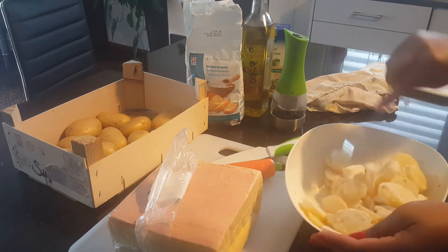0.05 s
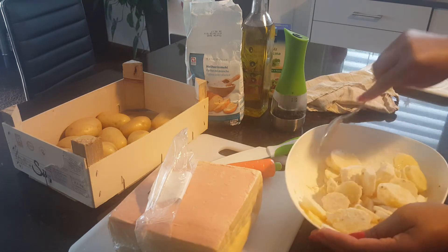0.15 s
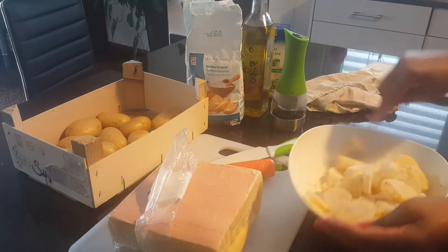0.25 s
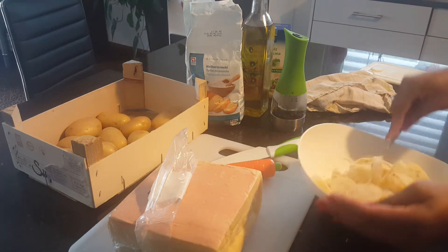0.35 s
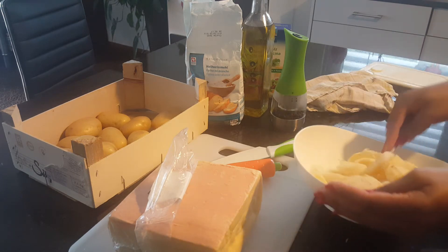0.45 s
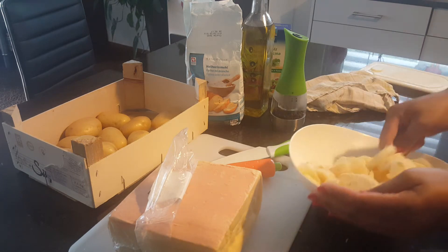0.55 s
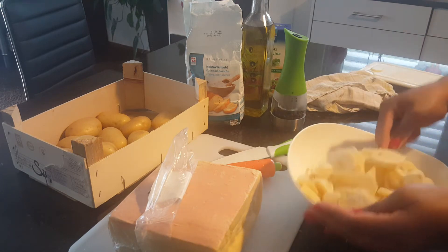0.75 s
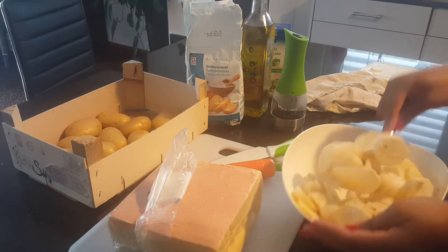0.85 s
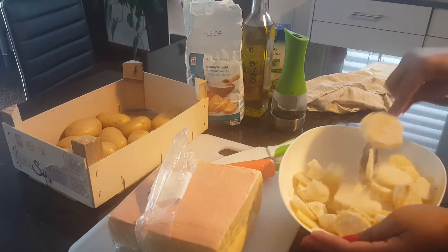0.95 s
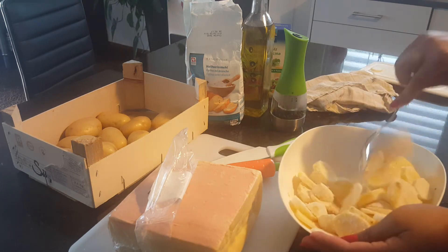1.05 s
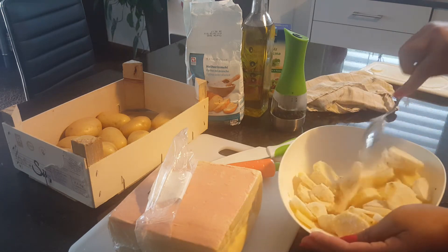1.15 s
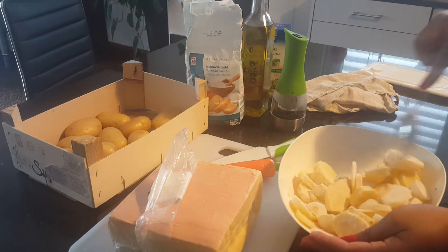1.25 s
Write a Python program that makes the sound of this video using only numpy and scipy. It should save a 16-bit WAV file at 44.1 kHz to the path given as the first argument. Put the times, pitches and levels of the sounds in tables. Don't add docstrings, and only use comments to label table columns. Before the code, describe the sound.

A metal spoon turns raw potato slices in a bowl, heard close by a phone microphone. A soft wet slide fades before a hard, bright, quickly damped knock at 0.23 s. A light tick follows at 0.29, then scrapes with small clicks near 0.35 and, fainter, 0.6. Sliding ebbs until a soft, dull landing at 1.0 s and a faint trailing rustle. Low appliance hum and short kitchen echoes surround it.

```python
import sys
import numpy as np
from scipy import signal
from scipy.fft import rfft, irfft
from scipy.io import wavfile

SR = 44100
rng = np.random.default_rng(int(sys.argv[2]) if len(sys.argv) > 2 else 0)


def bounce(signal):
    frames = np.transpose(np.atleast_2d(signal))
    limited = np.clip(frames, -1, 1)
    pcm = np.round(limited * 32767).astype(np.int16)
    wavfile.write(sys.argv[1], SR, pcm)


def to_linear_factor(level_db):
    exponent = np.asarray(level_db, float) / 20
    return 10 ** exponent


N = 57330


def evened(x):
    return x / np.sqrt(np.mean(x ** 2) + 1e-20)


def read(points, hz):
    f, value = np.transpose(points)
    return np.interp(np.log(hz + 1), np.log(f + 1), value)


def add(mix, s, sound):
    part = mix[round(s * SR):][:len(sound)]
    part += sound[:len(part)]


def coloured(x, spectrum):
    n = x.shape[-1]
    gain = to_linear_factor(read(spectrum, np.fft.rfftfreq(n, 1 / SR)))
    return irfft(rfft(x) * gain, n)


def left_right(a, b, same):
    return np.array([a, same * a + np.sqrt(1 - same ** 2) * b])


# frequency [Hz], level [dB].
HUM_SPECTRUM = [(25, -13.5), (45, -21.5), (130, -6), (400, -11), (1000, -16.5), (3000, -33.5), (6500, -53),
                (15000, -47.5)]
# centre [Hz], width [Hz], level [dB].
DRONES = [(68, 7.7, -75), (99.8, 6.2, -60.5), (132.3, 17, -56), (171, 8.3, -68.5), (277.3, 10, -64),
          (457, 25, -67)]
# frequency [Hz], likeness [-1 to 1].
LIKENESS = [(60, 0.98), (180, 0.92), (550, 0.67), (1650, -0.46), (4970, 0.14), (15000, -0.18)]


def appliance_hum():
    hum_db = -48
    hz = np.fft.rfftfreq(N, 1 / SR)
    a, b = rfft(rng.standard_normal((2, N)))
    noise = left_right(a, b, np.clip(read(LIKENESS, hz), -1, 1))
    out = to_linear_factor(hum_db) * evened(irfft(noise * to_linear_factor(read(HUM_SPECTRUM, hz)), N))
    for centre_hz, width_hz, db in DRONES:
        peak = 1 / (1 + ((hz - centre_hz) / width_hz * 2) ** 2)
        out = out + to_linear_factor(db) * evened(irfft(noise * peak, N))
    return out


# delay [s], left level [dB], right level [dB].
ECHOES = [(.0007, -20.5, -15), (.0019, -10.5, -39), (.0028, -49, -38), (.0072, -10.5, -10.5),
          (.0112, -24, -30), (.016, -24.5, -21.5), (.0225, -21, -24), (.029, -15, -21)]
# frequency [Hz], time to fall 60 dB [s].
TAIL_T60 = [(250, 0.48), (700, 0.63), (1800, 0.48), (4500, 0.8), (12000, 0.3)]


def early_echoes():
    dull_hz = 2310
    echoes = np.zeros((2, 2048))
    for s, left_db, right_db in ECHOES:
        echoes[:, round(s * SR)] = to_linear_factor([left_db, right_db])
    return signal.lfilter(*signal.butter(1, dull_hz, fs=SR), echoes)


def late_tail():
    tail_db, start_s = -5.5, 0.0082
    spacing = 20
    taps = np.zeros((2, SR))
    jitter = rng.integers(0, spacing, (2, (SR - 1) // spacing))
    at = np.arange(0, SR - spacing, spacing) + jitter
    np.put_along_axis(taps, at, rng.choice([-1., 1.], at.shape), 1)
    hz, t, z = signal.stft(taps, SR, nperseg=256)
    z = left_right(z[0], z[1], np.clip(read(LIKENESS, hz), 0, 1)[:, None])
    decay = to_linear_factor(-60 * t / read(TAIL_T60, hz)[:, None])
    tail = signal.istft(z * decay, SR, nperseg=256)[1]
    tail = np.pad(tail, ((0, 0), (round(start_s * SR), 0)))
    return tail * to_linear_factor(tail_db) / np.linalg.norm(tail[0])


def kitchen(x, wet):
    late = signal.fftconvolve(wet[None], late_tail(), axes=1)[:, :N]
    early = signal.fftconvolve(x[None], early_echoes(), axes=1)[:, :N]
    return late + early


# time [s], pressure [dB], wet sizzle [dB].
STROKE = [(0, -52.5, -2), (.08, -62, -1), (.23, -82, 8), (.237, -48.5, 6.5), (.3, -51, 3.5),
          (0.339, -39.5, 2.5), (0.364, -43, 4.5), (.395, -50, 0.5), (.48, -53, -0.5), (.55, -49, 4.5),
          (0.598, -44, 0), (.65, -50, -0.5), (.74, -59, -2), (.995, -75.5, 10), (1.008, -54.5, 4),
          (1.07, -55.5, -11), (1.12, -60.5, -7), (1.3, -68, 0)]
# frequency [Hz], level [dB].
SCRAPE_SPECTRUM = [(200, -7), (800, 8), (2000, 4.5), (3000, -2), (5000, -9.5), (8000, -18), (12500, -18.5),
                   (16000, -29)]


def scrape():
    slips_per_s, slip_s, spread_db = 2200, 0.0029, 2.2
    sizzle_hz, left_db, likeness = 4630, 1.2, 0.027
    strength = to_linear_factor(spread_db * np.minimum(rng.exponential(1, N), 4))
    slips = strength * (rng.random(N) < slips_per_s / SR)
    puffs = np.sqrt(signal.lfilter([1], [1, -np.exp(-1 / (slip_s * SR))], slips ** 2))
    a, b = rng.standard_normal((2, N))
    pair = evened(coloured(puffs * left_right(a, b, likeness), SCRAPE_SPECTRUM))
    body = signal.sosfiltfilt(signal.butter(2, sizzle_hz, fs=SR, output="sos"), pair)
    s, pressure_db, sizzle_db = np.transpose(STROKE)
    t = np.arange(N) / SR
    both = body + (pair - body) * to_linear_factor(np.interp(t, s, sizzle_db))
    return both * to_linear_factor([[left_db], [-left_db]]) * to_linear_factor(np.interp(t, s, pressure_db))


def ring(modes, contact_ms, turns, low_hz):
    t = np.arange(SR // 2) / SR
    hz, db, t60 = np.transpose(modes)[:, :, None]
    swell = 1 - np.exp(-t * hz / turns)
    decay = to_linear_factor(db - 60 * t / np.maximum(t60, .002))
    body = (swell * decay * np.sin(2 * np.pi * hz * t)).sum(0)
    phase = np.clip((np.arange(64) + .5) / SR / (contact_ms / 1000), 0, 1)
    push = np.sin(np.pi * phase)
    radiated = signal.butter(3, low_hz, "high", fs=SR, output="sos")
    return -signal.sosfilt(radiated, np.convolve(body, push / push.sum()))


# start [s], level [dB], pitch [Hz].
TICKS = [
    (0.2888, -23.5, 1660),
    (0.334, -42, 2300),
    (0.351, -24.5, 2660),
    (0.3535, -30.5, 2970),
    (0.357, -28.5, 2014),
    (0.5534, -44, 4560),
    (0.5957, -32, 2830),
    (0.5982, -34.5, 2200),
    (0.604, -39.5, 3950),
]


def tip_ticks():
    t60, upper_ratio, upper_db = .013, 1.7, -16
    out = np.zeros(N)
    for s, db, hz in TICKS:
        modes = [(hz, db, t60), (hz * upper_ratio, db + upper_db, t60)]
        add(out, s, ring(modes, contact_ms=.06, turns=1.0, low_hz=640))
    return out


def edge_crack(top_hz):
    decay_s = 0.00098
    i = np.arange(512)
    crack = 0.4 * rng.standard_normal(512) * np.exp(-i / SR / decay_s)
    click = i == 4
    band = signal.butter(2, [3500, top_hz], "band", fs=SR, output="sos")
    return signal.sosfilt(band, crack - click)


# frequency [Hz], level [dB], time to fall 60 dB [s].
WALL = [(229.2, -11, 0.093), (374, -8, 0.059), (549, -14.5, 0.043), (681.3, -18, 0.12), (723, -28.5, 0.12),
        (777, -5.5, 0.15), (919, -9.5, 0.043), (942, 0.5, 0.016), (1123, 6, 0.0087), (1750, -1, 0.013),
        (1890, -2.5, 0.013), (2496, -15, 0.019), (3320, -18, 0.019), (4480, -20.5, 0.016)]
# frequency [Hz], level [dB], time to fall 60 dB [s].
BOTTOM = [(69.3, -14, .3), (188, 1, 0.044), (398, -2.5, 0.038), (700, -1.5, 0.026), (918, 6, 0.017),
          (1144, 3, 0.016), (1296, -1, 0.019), (1810, 1.5, 0.016), (2036, -7.5, 0.016), (2740, -11, 0.017),
          (3400, -18, 0.013), (5220, -14, 0.0066)]
BLOW_STARTS = (0.2333, 0.9996)
# level [dB], contact [ms], swell [turns], lowest radiated frequency [Hz].
BLOWS = [
    (-9, 0.16, 0.44, 276),
    (-22, 0.24, 1, 24),
]
# level [dB], top frequency [Hz].
CRACKS = [
    (-18.5, 9600),
    (-34, 6800),
]


def knocks():
    out = np.zeros((2, N))
    for row, s, blow, crack, modes in zip(out, BLOW_STARTS, BLOWS, CRACKS, (WALL, BOTTOM)):
        db, contact_ms, turns, low_hz = blow
        crack_db, top_hz = crack
        add(row, s, to_linear_factor(db) * ring(modes, contact_ms, turns, low_hz))
        add(row, s, to_linear_factor(crack_db) * edge_crack(top_hz))
    return out


ROOM_SHARE = (-2, 3.5, -3)


def scene():
    left_db, lag_s = .6, .00005
    rows = np.vstack([knocks(), tip_ticks()])
    blows = rows.sum(0)
    late = np.interp(np.arange(N) - lag_s * SR, np.arange(N), blows)
    near = np.array([late * to_linear_factor(left_db), blows * to_linear_factor(-left_db)])
    wet = to_linear_factor(np.array(ROOM_SHARE)) @ rows
    return near + kitchen(blows, wet) + scrape() + appliance_hum()


def band_limit(x):
    return signal.sosfilt(signal.butter(12, 16600, fs=SR, output="sos"), x)


def record(dry):
    return band_limit(dry)


dry = scene()
out = record(dry)
bounce(out)
```